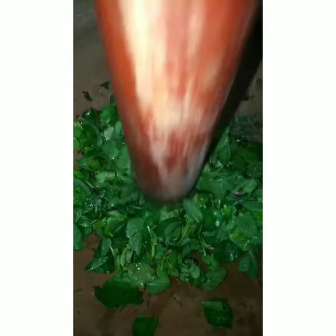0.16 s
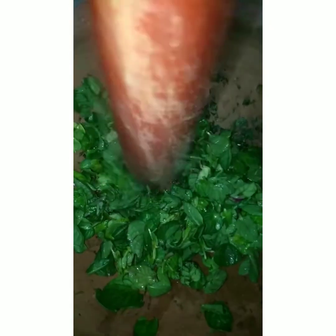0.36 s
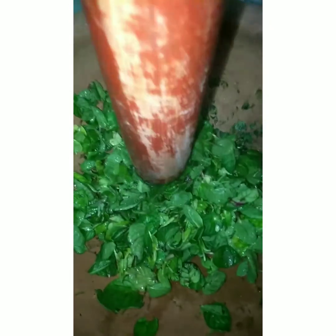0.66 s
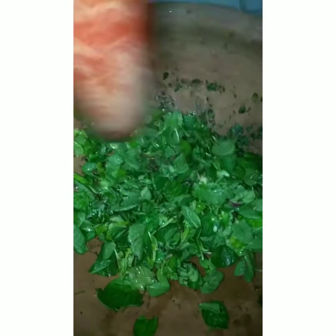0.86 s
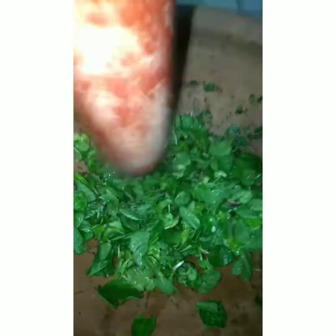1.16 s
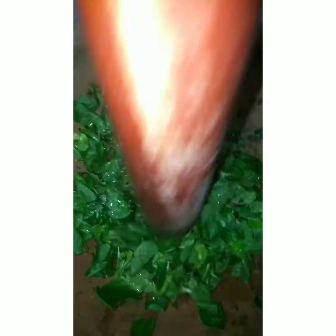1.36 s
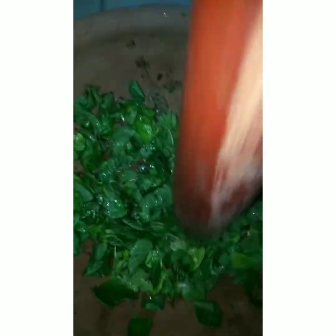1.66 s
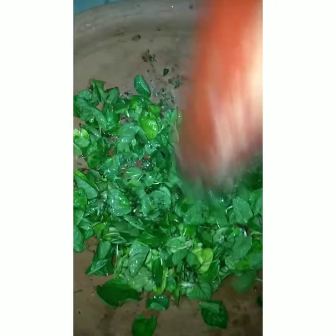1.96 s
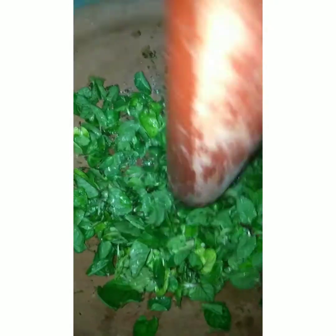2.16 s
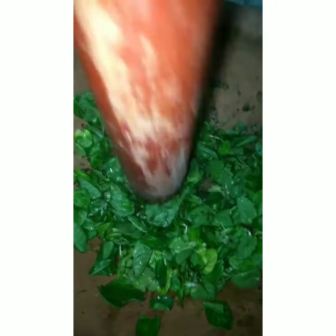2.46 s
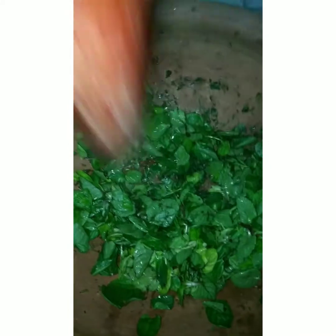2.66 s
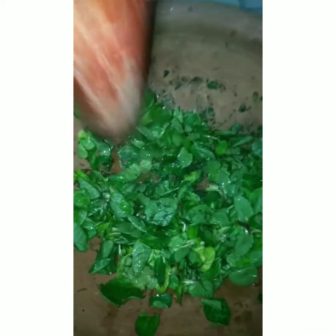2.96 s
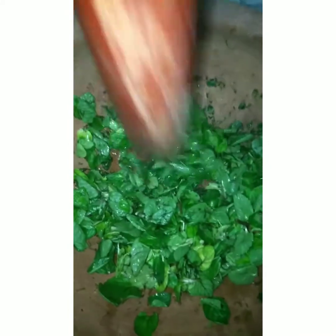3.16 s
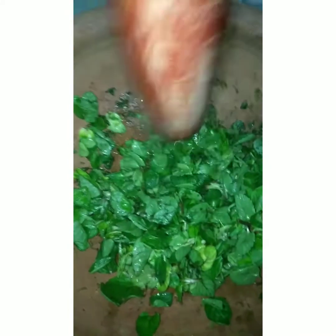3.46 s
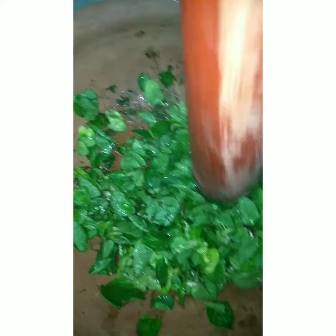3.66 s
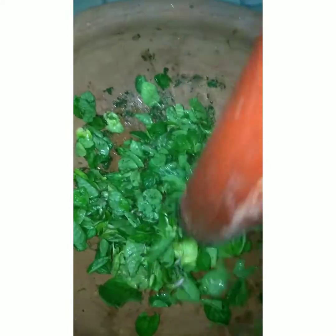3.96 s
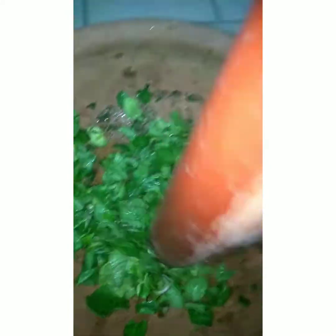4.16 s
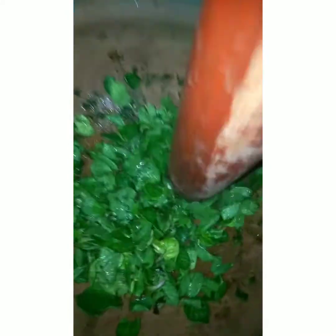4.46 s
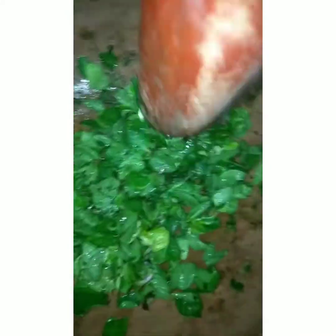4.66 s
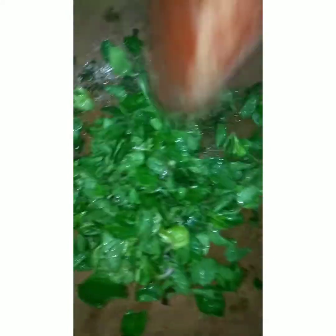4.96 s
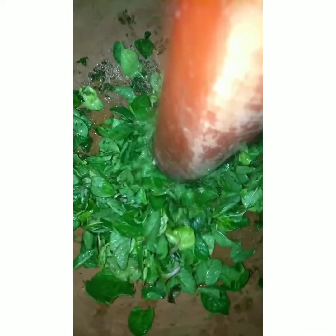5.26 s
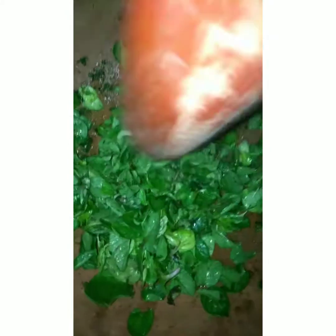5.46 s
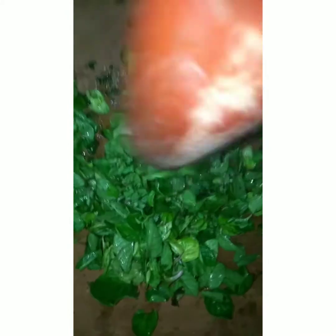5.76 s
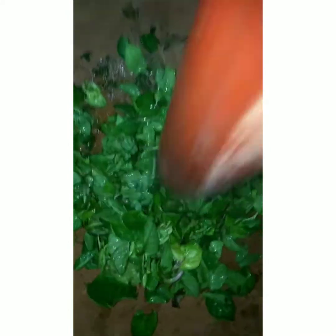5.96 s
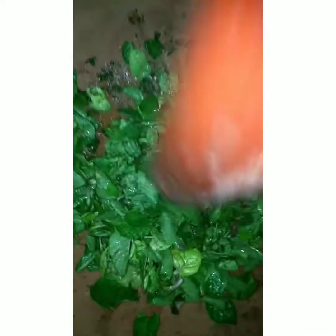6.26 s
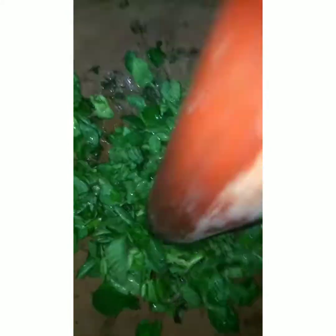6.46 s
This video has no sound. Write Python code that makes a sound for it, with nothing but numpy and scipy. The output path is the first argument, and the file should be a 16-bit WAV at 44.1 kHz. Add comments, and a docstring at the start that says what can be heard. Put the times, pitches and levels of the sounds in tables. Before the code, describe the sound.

Quick, even thumps and knocks of a wooden pestle crushing leaves in a mortar, booming slightly in a small kitchen.

```python
"""Over the faint rumble of a house, a wooden pestle pounds fresh leaves, about 3.5 blows a second.
Each blow bursts leaves for a few milliseconds, then thuds and excites the damped modes of the heavy
mortar and of the pestle: blows cushioned by leaves are dull, those that reach the bottom knock.
The small kitchen booms after each blow. Loose leaves slide in the heap, and once a soft swish starts
suddenly and fades. Near the end, soft bumps push on the case of the phone close by."""
import sys
import numpy as np
from scipy import signal
from scipy.fft import rfft, irfft
from scipy.io import wavfile
from scipy.ndimage import uniform_filter1d, minimum_filter1d

SR = 44100
rng = np.random.default_rng(int(sys.argv[2]) if len(sys.argv) > 2 else 0)


def materialize(psi):
    """Save the field psi as 16-bit PCM at rate SR to the path in sys.argv[1].

    A 1-D psi becomes a single channel; in a 2-D psi each row is a channel.
    """
    bounded = np.clip(np.atleast_2d(psi).T, -1, 1)
    quanta = np.round(bounded * 32767).astype(np.int16)
    wavfile.write(sys.argv[1], SR, quanta)


N = 291501
SHOT, LEAD = 2 ** 15, 2 ** 11  # samples in one blow, and those of them before the landing
AGE = (np.arange(SHOT) - LEAD) / SR  # time since the pestle lands [s]
AFTER = np.maximum(AGE, 0)

# spectrum of bursting leaves and of ticks on the case: (frequency [Hz], relative level [dB])
CRUNCH_SPECTRUM = [(300, 4), (1200, -12), (2000, 10), (2900, 6.5), (3800, 0), (5000, -2.5), (6400, -2),
                   (7800, 6), (9000, -2.5), (10500, -8.5), (13000, -5.5), (15300, 1), (16500, -3.5)]


def undb(db):
    """Decibels to amplitude ratio."""
    return 10 ** (np.asarray(db) / 20)


def along(hz, table, column=1):
    """Interpolate a table column on a logarithmic frequency axis."""
    table = np.array(table, float)
    return np.interp(np.log(hz + 1e-3), np.log(table[:, 0]), table[:, column])


def colour(x, spectrum):
    """Linear filtering: multiply the spectrum of x by a curve of (frequency [Hz], gain [dB])."""
    size = x.shape[-1]
    return irfft(rfft(x) * undb(along(np.fft.rfftfreq(size, 1 / SR), spectrum)), size)


def level(x, db):
    """Set the rms level of the 30 ms around the landing."""
    return x * undb(db) / np.sqrt(np.mean(x[..., (AGE > -.008) & (AGE < .022)] ** 2))


def clicks(per_s, spread_db, size=SHOT):
    """Shot noise: tiny independent snaps of unequal size, rms 1."""
    x = (rng.random(size) < per_s / SR) * rng.standard_normal(size)
    x *= undb(spread_db * rng.standard_normal(size))
    return x / x.std()


def push(width_s):
    """Gaussian contact force of unit sum: the longer the contact, the less treble it excites."""
    force = np.exp(-.5 * ((AGE - width_s) / width_s) ** 2)
    return force / force.sum()


def ring(x, modes, scatter=0.):
    """Modal superposition: x drives damped sines whose pitch shifts with the point of contact."""
    response = 0
    for hz, db, t60 in modes:
        detuned_hz = hz * (1 + scatter * rng.standard_normal())
        decay = np.exp(-np.log(1000) * AFTER / t60)
        response = response + undb(db) * np.sin(2 * np.pi * detuned_hz * AFTER) * decay
    return signal.fftconvolve(x, response[LEAD:])[:len(x)]


def favour(modes, centre_hz, lift_db, width_hz):
    """Selective excitation: the place and angle of a blow strengthen the modes near one frequency."""
    return [(hz, db + lift_db * np.exp(-((hz - centre_hz) / width_hz) ** 2), t60)
            for hz, db, t60 in modes]


def add(out, s, x):
    """Superpose an event on the scene so that it lands at time s."""
    start = int(s * SR) - LEAD
    end = min(N, start + SHOT)
    out[:, max(start, 0):end] += x[..., max(-start, 0):end - start]


def house_air(rms_db=-54.5):
    """Stationary coloured noise: the quiet rumble and hiss of the house."""
    # background spectrum: (frequency [Hz], relative level [dB])
    air_spectrum = [(15, -43), (25, 10), (70, -4), (236, -5), (405, -10), (560, -10), (677, -10.5),
                    (754, -16.5), (1160, -15.5), (2000, -17.5), (2610, -24.5), (4870, -32.5), (7710, -25.5),
                    (11300, -37), (16000, -25.5)]
    noise = colour(rng.standard_normal(N), air_spectrum)
    return noise / noise.std() * undb(rms_db)


def crushed_leaves(crunch_db, crush_s, brush_db):
    """Fracture noise: cells burst ahead of the landing, pulp squelches, leaves settle. Gives mid, side."""
    # spectrum of settling leaves: (frequency [Hz], relative level [dB])
    rustle_spectrum = [(300, -43), (1200, -26), (2100, -15), (3000, 8.5), (5200, 3), (6600, 4),
                       (7800, 14.5), (9200, -2.5), (11000, 0), (13000, -11), (15300, -28), (16500, -65.5)]
    burst_age = AGE + crush_s
    width_s = 0.00099 + 0.19 * crush_s
    burst = np.exp(-.25 * (burst_age / width_s) ** 2)
    brush = undb(brush_db) * np.exp(-abs(burst_age) / .012)  # the tip grazes the heap on its way down
    squelch = undb(-18) * np.exp(-abs(burst_age) / 0.033)
    crushing = burst + np.where(burst_age < 0, brush, squelch)
    mid, side = (level(colour(clicks(20000, 1.44) * crushing, CRUNCH_SPECTRUM), crunch_db)
                 for _ in range(2))
    settling = (AGE > 0) * np.exp(-(AFTER / 0.15) ** 2)
    rustle = level(colour(clicks(8200, 7.2) * settling, rustle_spectrum), crunch_db - 28.5)
    # only the treble of the crunch differs between left and right
    side = undb(-9) * signal.sosfilt(signal.butter(10, 4200, "high", fs=SR, output="sos"), side)
    return mid + rustle, side


def mortar(thud_db, hollow_db, knock_db):
    """Impact excitation: the landing thuds, shoves the whole mortar and rings its hollow and wall."""
    # modes of the hollow and of the wall: (frequency [Hz], relative level [dB], t60 [s])
    hollow_modes = [(415, -5, 0.046), (560, 2.5, 0.018), (663, 10, 0.026)]
    wall_modes = [(742.2, 8.5, 0.18), (758, 7, 0.16), (755, -8.5, 0.11), (669, 14, 0.037),
                  (800, -34, 0.042)]
    thud = level(ring(push(0.00011), [(226.6, 0, 0.02)]), thud_db)
    shove = level(ring(push(0.00019), [(50.0, 0, 0.016)]), knock_db - 22)
    hollow = level(ring(push(0.00018), hollow_modes, scatter=0.098), hollow_db)
    struck_modes = favour(wall_modes, centre_hz=772.6, lift_db=10, width_hz=27)
    knock = level(ring(push(.0001), struck_modes, scatter=0.011), knock_db)
    return thud + shove - hollow - knock


def pestle(crack_db, clack_db, clack_hz):
    """Flexural vibration: wood cracks against the bottom and the shaft rings in bending."""
    # modes of the contact and of the bending shaft: (frequency [Hz], relative level [dB], t60 [s])
    contact_modes = [(916, 5, 0.025), (1116, 3, 0.029), (1360, 3.5, 0.028), (1510, -2, 0.02),
                     (1760, -3, 0.034), (2400, -4.5, 0.05), (3500, 8, 0.022)]
    bending_modes = [(1880, -23.5, 0.43), (1955, -2.5, 0.082), (2004, 3, 0.049), (2050, -12, 0.26),
                     (2117, -7, 0.062), (2252, 0, 0.043), (2452.5, 5.5, 0.046), (2720, -37, 0.069),
                     (2905, -1, 0.042)]
    crack = ring(push(.00008), contact_modes, scatter=0.04)
    struck_modes = favour(bending_modes, clack_hz, lift_db=13, width_hz=62)
    clack = ring(push(.00005), struck_modes, scatter=0.0055)
    return level(crack, crack_db) + level(clack, clack_db)


def blow(force_db, contact_db, ring_db, clack_hz, crush_s, since_s):
    """Cushioned impact: force drives thud and crunch, bottom contact knock and crack. Gives mid, side."""
    refill_s = 0.13  # fresh leaves fall back under the tip; a quick rebound finds few
    fresh_db = 20 * np.log10(1 - np.exp(-(since_s / refill_s) ** 2))
    crunch_db = -33.5 + 0.61 * force_db + fresh_db
    brush_db = -22.5 - 0.12 * contact_db  # a deep cushion is brushed more
    thud_db = -33.5 + force_db + 0.12 * contact_db
    hollow_db = -29.5 + force_db + 0.37 * contact_db
    # a sharper contact wakes higher pestle modes and cracks harder
    crack_db = -25 + 1.16 * contact_db + 0.0193 * (clack_hz - 2140)
    crunch, side = crushed_leaves(crunch_db, crush_s, brush_db)
    bowl = mortar(thud_db, hollow_db, knock_db=contact_db - 14)
    shaft = pestle(crack_db, clack_db=ring_db - 21, clack_hz=clack_hz)
    return crunch + bowl + shaft, side


def kitchen(x, wall_s=0.012, tiles_s=.0178, build_s=0.00084):
    """Reverberation: a diffuse tail, early reflections from a wall and hard tiles, and standing waves."""
    # diffuse field: (frequency [Hz], level against the direct sound [dB], t60 [s])
    diffuse_field = [(59, -12.5, 0.65), (108, 1.5, 0.82), (147, 6, 0.62), (274, -1, 0.41), (484, 3.5, 0.5),
                     (776, -10.5, 0.4), (1300, -10, 0.57), (1995, -9, 0.55), (2700, -26, 0.73),
                     (3580, -13, 0.027), (8000, -11.5, 0.081), (16000, -10.5, 0.075)]
    # room modes: (frequency [Hz], relative level [dB], t60 [s])
    standing_waves = [(132.1, -7.5, 1), (159, -8, 1), (175, -1.5, 0.5), (180.8, -3.5, 1), (252.4, 1, 0.47),
                      (306.7, -11.5, 1), (407, -16, 0.77), (516, -7, 0.36), (538.4, -2, 0.47),
                      (638, -16.5, 0.37)]
    hz = np.fft.rfftfreq(SHOT, 1 / SR)
    source, noise, tail = rfft(x), rfft(rng.standard_normal(SHOT)), 0
    build_up = 1 - np.exp(-(AFTER / build_s) ** 2)
    edges_hz = np.geomspace(45, 20480, 24)
    for lo, hi in zip(edges_hz, edges_hz[1:]):
        band, centre_hz = (hz >= lo) & (hz < hi), np.sqrt(lo * hi)
        decay = np.exp(-np.log(1000) * AFTER / along(centre_hz, diffuse_field, column=2))
        response = irfft(noise * band) * decay * build_up
        echo = source * rfft(response[LEAD:], SHOT)
        # each band returns energy in proportion to what the blow put into it
        echo *= np.linalg.norm(source[band]) / np.linalg.norm(echo)
        tail = tail + echo * undb(along(centre_hz, diffuse_field))
    dulled = signal.sosfilt(signal.butter(2, 2500, fs=SR, output="sos"), x)
    wall_slap = undb(-15) * np.interp(AGE - wall_s, AGE, dulled)
    tile_slap = undb(-21) * np.interp(AGE - tiles_s, AGE, x)
    return irfft(tail) + wall_slap + tile_slap + undb(-53) * ring(x, standing_waves)


def hiss_swells():
    """Amplitude-modulated shot noise: dense tiny snaps merge into a hiss that swells and fades."""
    # swells: (peak time [s], rise [s], fall [s], level [dB])
    # At 1.768 s a soft swish starts suddenly and fades; at 4.728 s a short, sharp extra crunch
    # sounds as the pestle lands. The others are loose leaves sliding in the heap.
    swells = [(.45, 0.011, 0.022, -55), (.93, 0.085, 0.13, -57.5), (1.35, 0.17, 0.36, -53.5),
              (1.768, 0.0054, 0.2, -45), (2.9, .07, 0.17, -57), (3.23, 0.1, 0.11, -58),
              (3.4, 0.013, 0.014, -53), (4.63, 0.082, 0.23, -49.5), (4.728, .003, .035, -37),
              (5.23, 0.098, .05, -53.5), (5.7, 0.14, 0.067, -48), (6.278, .05, 0.1, -107)]
    # spectrum of the hiss: (frequency [Hz], relative level [dB])
    hiss_spectrum = [(400, 8), (1000, 6.5), (2100, 5.5), (3700, -3), (5200, -6), (6600, -3.5), (7800, 5),
                     (9200, -5), (11000, -10.5), (13000, -10.5), (15300, 2.5), (16500, -18)]
    t = np.arange(N) / SR
    envelope = sum(undb(db) * np.exp(-((t - s) / np.where(t < s, rise_s, fall_s)) ** 2)
                   for s, rise_s, fall_s, db in swells)
    snaps = colour(clicks(9000, spread_db=1.5, size=N), hiss_spectrum)
    return snaps / snaps.std() * envelope


def case_bump(db, half_s):
    """Elastic recoil: the case is pushed in and springs back, giving one pressure swing and a tick."""
    u = AGE / half_s
    swing = -u * np.exp((1 - u ** 2) / 2)
    tick = np.exp(-5 * (u + 1.3) ** 2) * colour(clicks(14000, 1.3), CRUNCH_SPECTRUM)
    return undb(db) * (swing + undb(db + 8) * tick)  # the tick grows as the square of the strength


def limiter(x, ceiling_db=-9, recover_db_per_s=12):
    """Peak limiting: the gain drops just ahead of a peak over the ceiling, then creeps back up."""
    over_db = np.maximum(20 * np.log10(abs(x).max(axis=0) + 1e-9) - ceiling_db, 0)
    recovery_db = recover_db_per_s * np.arange(N) / SR
    cut_db = np.maximum.accumulate(over_db + recovery_db) - recovery_db
    gain_db = uniform_filter1d(minimum_filter1d(-cut_db, size=65), size=65)
    return x * undb(gain_db)


def scene():
    """Superposition in stereo: house air, blows with their reverberation, swells of hiss and bumps."""
    # pestle blows: (time [s], force [dB], contact with the bottom [dB], pestle ring [dB],
    # favoured pestle frequency [Hz], crushing time before the landing [s])
    blows = [(0.0867, -2.5, -3.5, -3, 2123, 0.0018), (0.3716, -2, -34, -17.5, 2010, 0.00062),
             (0.672, -1, -23, -21, 1960, 0.0031), (0.9724, 0.5, -26.5, -20.5, 2050, 0.00068),
             (1.2597, -4.5, -36.5, -19.5, 2030, 0.0013), (1.55, -3, -27, -27, 1920, 0.0024),
             (1.842, -3, -27.5, -13, 2100, 0.0011), (2.134, -3, -2.5, 1.5, 1990, 0.0032),
             (2.42, 3.5, -3.5, 0.5, 1973, 0.0012), (2.7211, 2, -17.5, -14, 1986, 0.0019),
             (3.014, 6.5, -5.5, -18, 2120, 0.001), (3.2935, 2.5, -16.5, -16.5, 2390, 0.00027),
             (3.327, -1, -14, -43, 1980, .0002), (3.595, -3, -30.5, -11, 2020, .001),
             (3.8796, 6, 0.5, 2, 2478, 0.00042), (4.1704, 3.5, -12.5, -8, 2470, 0.00042),
             (4.4426, -3.5, -24, -17.5, 1956, 0.0021), (4.7269, -2.5, -8, -9.5, 1897, 0.00016),
             (5.0143, 2.5, -2.5, -2, 2356, 0.00017), (5.299, 0.5, -27, -15, 1930, 0.0012),
             (5.583, -2.5, -18.5, -22, 2040, 0.0024), (5.871, 2.5, -7.5, 0.5, 2092, 0.0011),
             (6.154, -5.5, -5, -8, 2307, 0.0008), (6.4404, -6.5, -1, -2.5, 2070, 0.00045)]
    # soft bumps on the phone's case: (time [s], peak of the swing [dB], half length [s])
    bumps = [(6.3695, -22.5, 0.00094), (6.3846, -29, 0.0015), (6.395, -44, 0.0055)]
    out, last_s = np.zeros((2, N)), -np.inf
    for s, force_db, contact_db, ring_db, clack_hz, crush_s in blows:
        direct, side = blow(force_db, contact_db, ring_db, clack_hz, crush_s, s - last_s)
        add(out, s, direct + kitchen(direct) + np.outer([1, -1], side))
        last_s = s
    for s, db, half_s in bumps:
        add(out, s, case_bump(db, half_s))
    return out + hiss_swells() + house_air()


def record(dry):
    """Peak and band limiting: the phone holds down the hardest blows and cuts the treble above 16 kHz."""
    return signal.sosfilt(signal.ellip(8, .2, 70, 16000, fs=SR, output="sos"), limiter(dry))


dry = scene()
out = record(dry)
materialize(out)
```